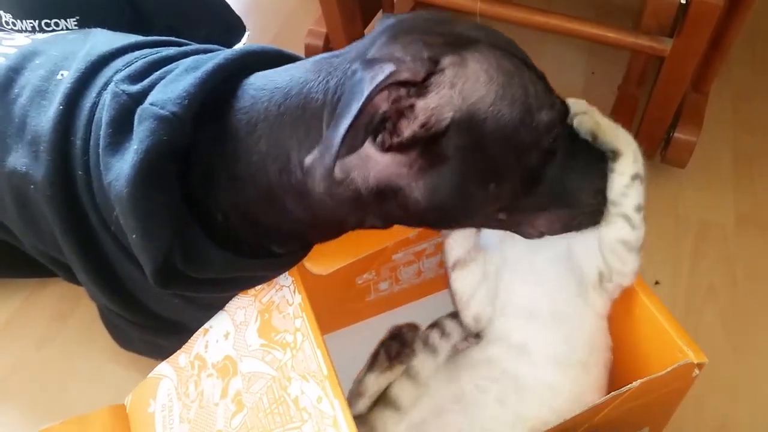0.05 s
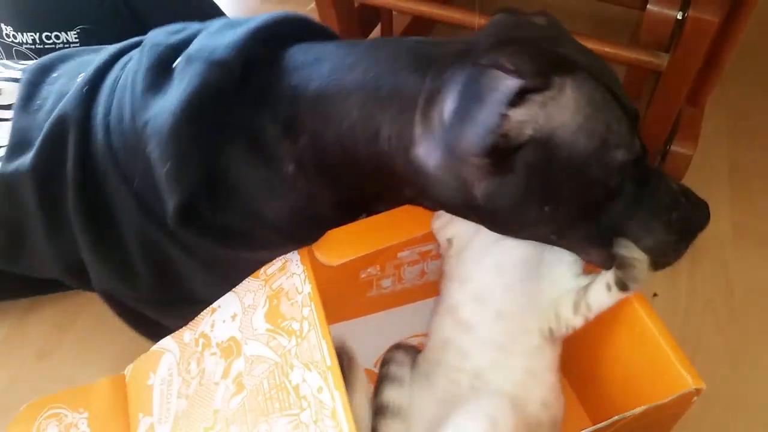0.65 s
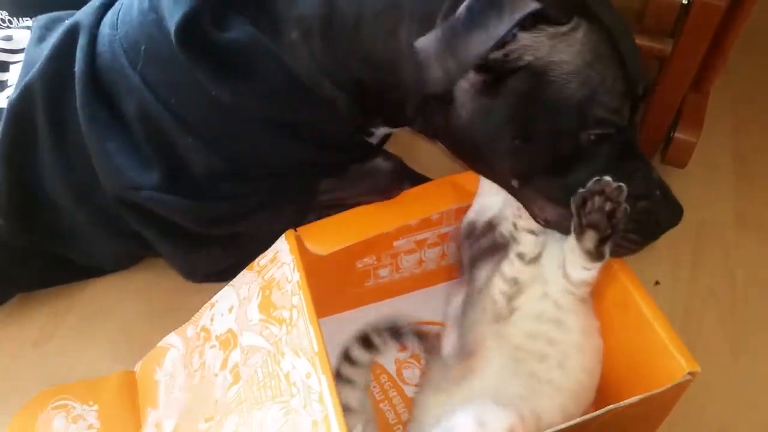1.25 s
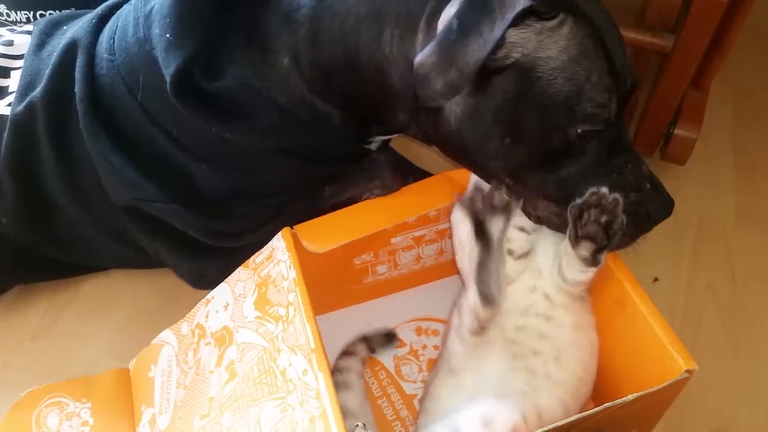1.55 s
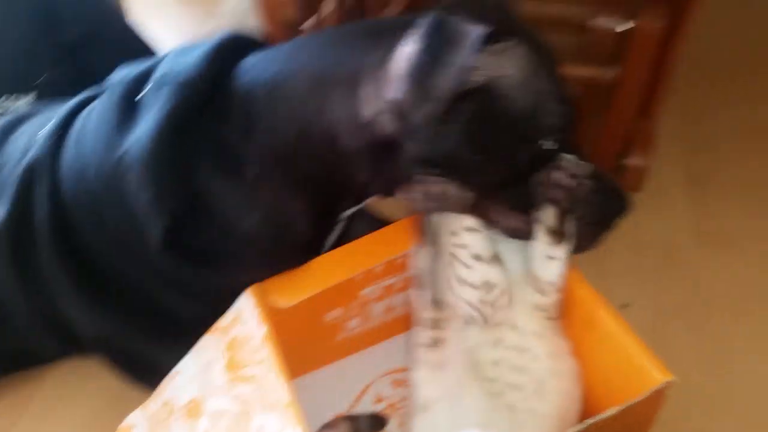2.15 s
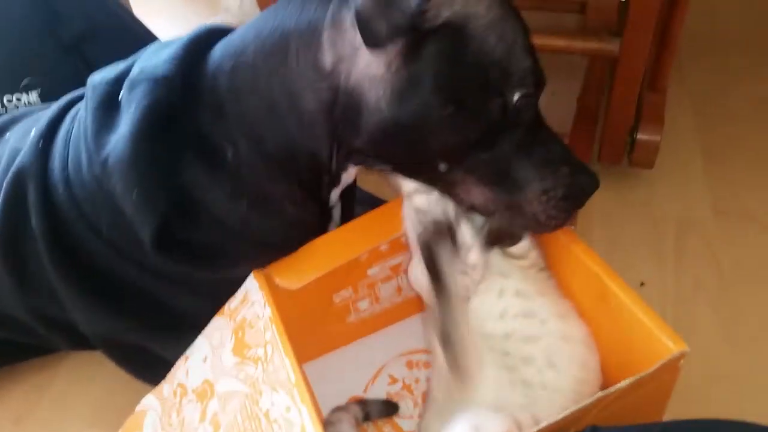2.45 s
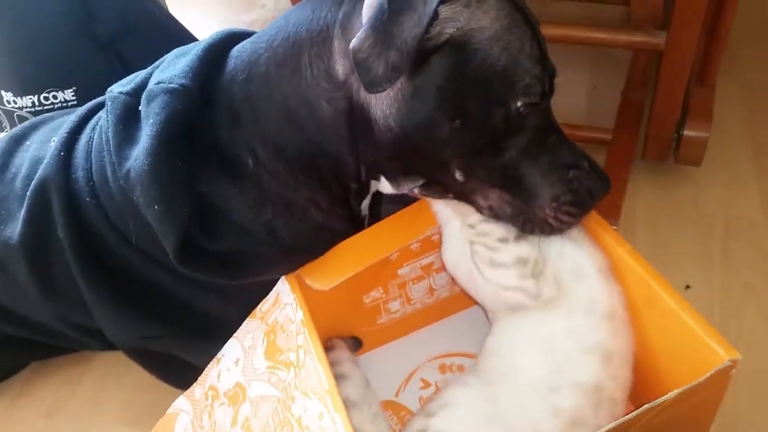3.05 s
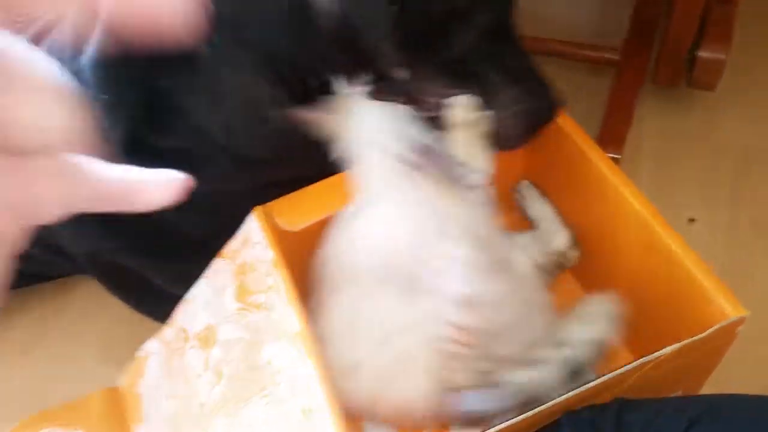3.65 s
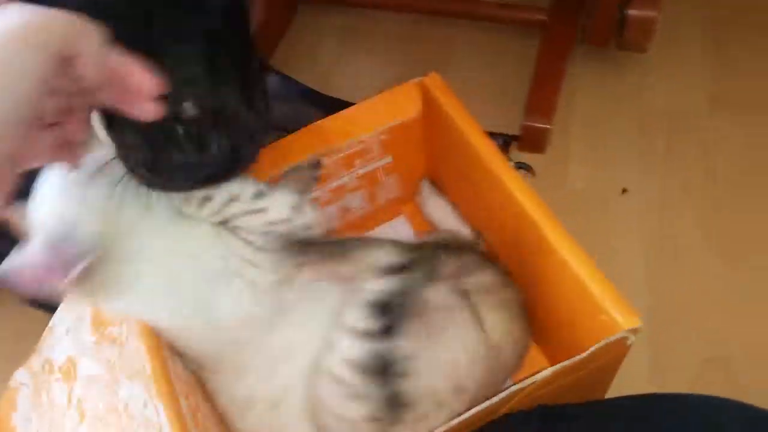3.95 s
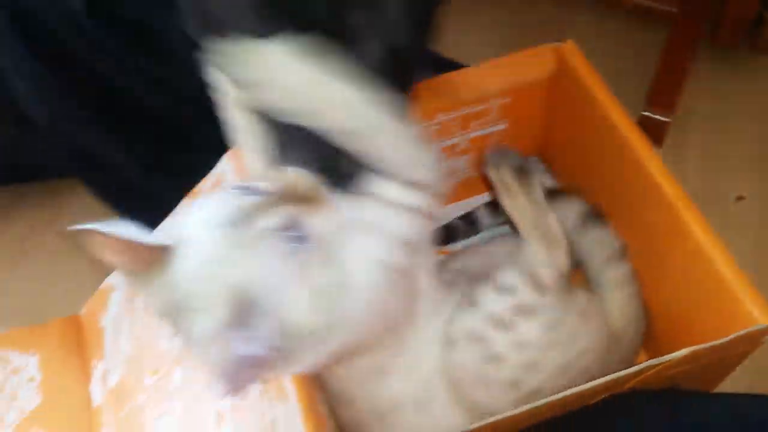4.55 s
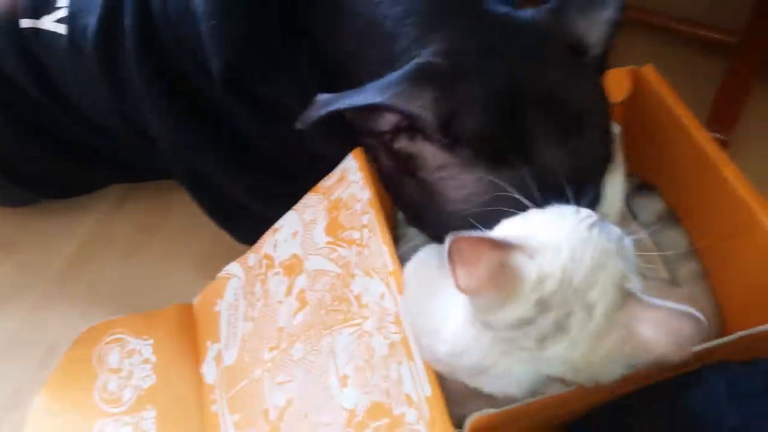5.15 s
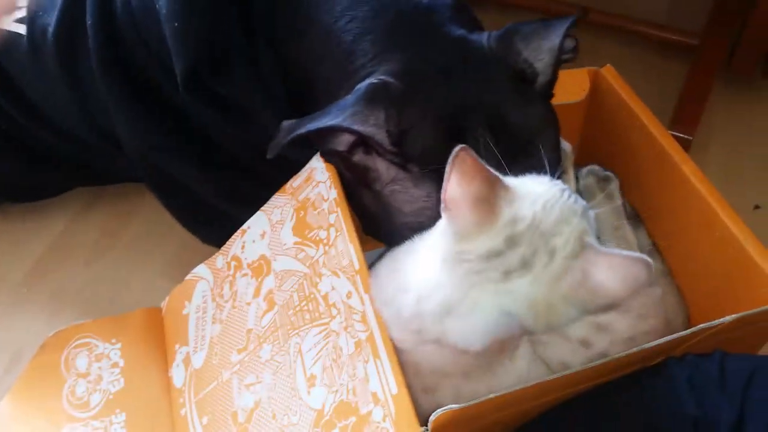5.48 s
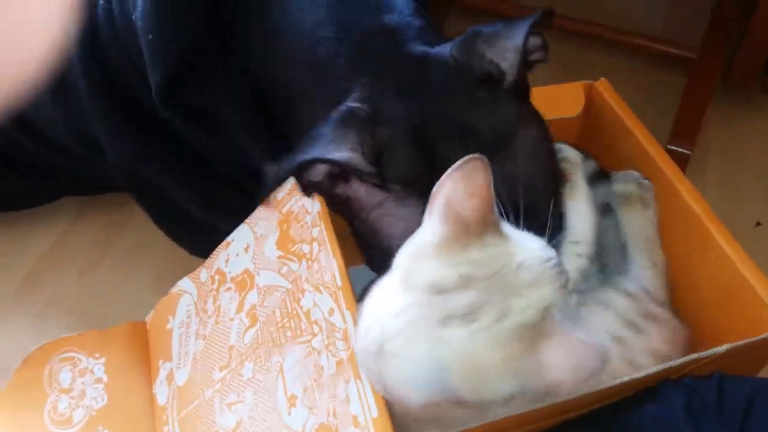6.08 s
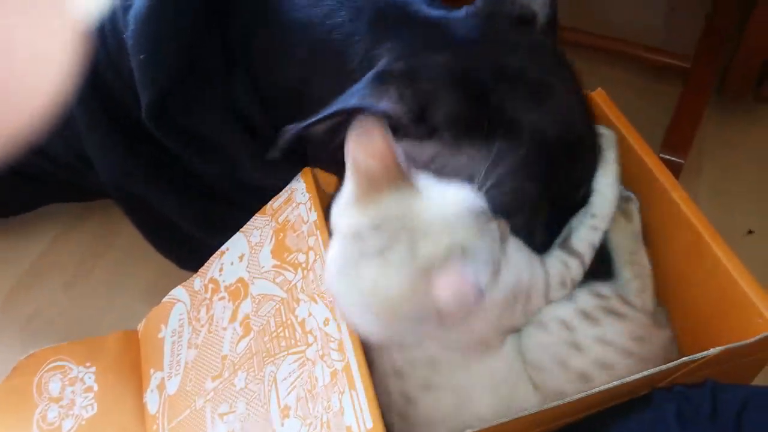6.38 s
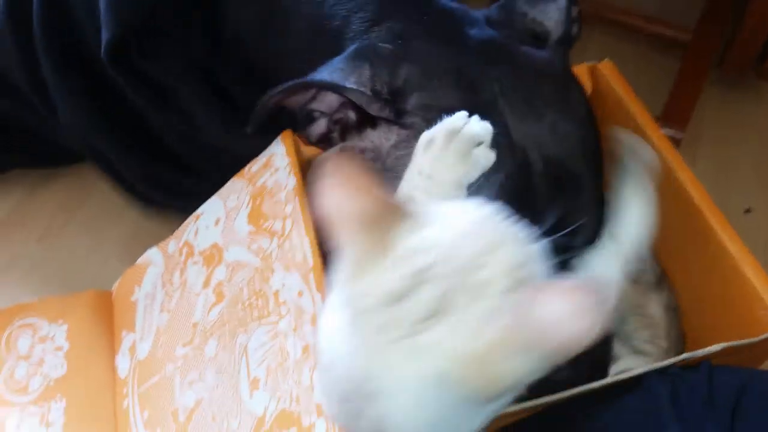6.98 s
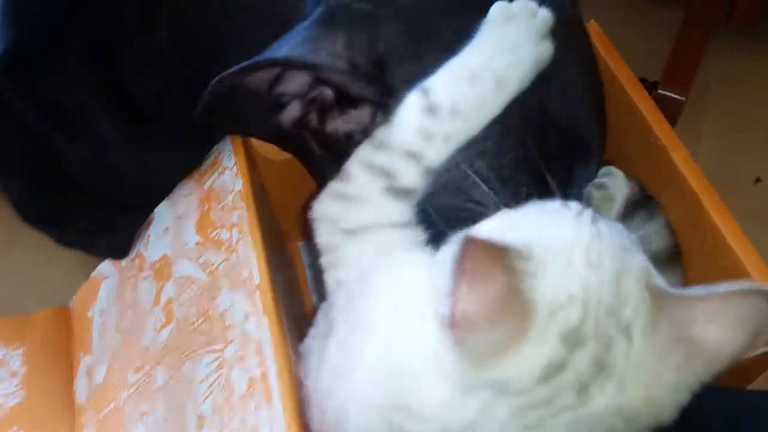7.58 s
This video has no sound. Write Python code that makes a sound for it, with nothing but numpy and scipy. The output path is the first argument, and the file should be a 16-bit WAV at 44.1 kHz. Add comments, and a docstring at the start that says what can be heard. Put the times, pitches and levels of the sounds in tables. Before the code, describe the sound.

In a small, quiet room a kitten and a dog wrestle in a cardboard box, heard close and slightly to the left. After a faint nose whistle from the dog, fur rubs in uneven bouts, bodies knock the walls and claws tick and scrape. The microphone is bumped a few times. Things settle briefly to soft, wet lip smacks before a last, louder flurry of thumps, squeaks and scratches.

```python
"""First comes a thin whistle from a dog's nose, over the soft rub of fur on cardboard.
The dog and a kitten are scuffling in a shoe box on the floor of a small room. Their bodies thump
the walls, claws tap and scrape, the card squeaks, and in a lull the dog smacks its lips.
A hand-held camera close by gets bumped; its left port (microphone opening) is louder
and rings in the treble."""
import sys
import numpy as np
from scipy import signal
from scipy.fft import rfft, irfft, next_fast_len
from scipy.io import wavfile
from scipy.ndimage import uniform_filter1d, map_coordinates

SR = 44100
rng = np.random.default_rng(int(sys.argv[2]) if len(sys.argv) > 2 else 0)


def materialize(psi):
    """Save the field psi as 16-bit PCM at rate SR to the path in sys.argv[1].

    A 1-D psi becomes a single channel; in a 2-D psi each row is a channel.
    """
    bounded = np.clip(np.atleast_2d(psi).T, -1, 1)
    quanta = np.round(bounded * 32767).astype(np.int16)
    wavfile.write(sys.argv[1], SR, quanta)


N = 344862

# Levels are relative: each function adds its own gain.
# air whistling in the dog's nose: t/s, level/dB, length/s, f/Hz
NOSE_WHISTLES = [(0, -56, .14, 2440), (0.08, -57, .24, 2430), (0.28, -62, .36, 2420), (0, -73, .3, 3750),
                 (0, -77, .24, 7120), (0.2, -73, .3, 7020)]
# six bouts of wriggling that swell and come to rest: t/s, rubbing effort/dB, treble level/dB
WRIGGLES = [
    [(0.0, -66, -85.5), (0.498, -67.5, -85.5), (0.672, -58.5, -74), (0.94, -53.5, -60.5),
     (1.128, -57.5, -67), (1.274, -49.5, -62), (1.512, -65, -71), (1.622, -64.5, -79.5), (1.74, -84, -91)],
    [(1.78, -76.5, -89), (1.87, -55, -82), (1.978, -83, -78.5), (2.004, -63, -73.5), (2.284, -53.5, -67),
     (2.39, -51, -65), (2.56, -58, -72.5), (2.702, -70, -83), (2.8, -73, -83)],
    [(2.84, -79, -82), (2.952, -69.5, -80), (3.074, -69.5, -80.5), (3.314, -63, -79.5),
     (3.402, -57.5, -69.5), (3.706, -54.5, -60.5), (3.92, -52.5, -55.5), (4.07, -57, -60),
     (4.16, -74, -73.5)],
    [(4.2, -66.5, -69.5), (4.418, -73.5, -76.5), (4.796, -61.5, -71.5), (4.912, -67.5, -73),
     (5.06, -77, -85), (5.196, -80.5, -99), (5.402, -90, -99), (5.564, -77.5, -101), (5.68, -108, -101)],
    [(5.74, -90, -101), (5.818, -82, -101), (5.95, -80, -93), (6.146, -80, -101.5), (6.278, -78.5, -99),
     (6.46, -83, -107)],
    [(6.5, -75.5, -98), (6.838, -72, -82.5), (6.984, -60.5, -75.5), (7.142, -59, -62.5), (7.304, -59, -59),
     (7.462, -49, -57), (7.536, -51, -51), (7.706, -61, -67), (7.82, -69, -74)],
]
# a wall judders as weight leans on it: t/s, level/dB, f/Hz, length/s
WALL_JUDDERS = [(0.05, -52, 200.5, 0.12), (6.595, -48.5, 173, 0.062), (6.682, -48.5, 165, .04),
                (6.72, -58, 180, 0.14), (6.77, -71, 120, 0.033)]
# soft blows on the box: t/s, level/dB, f/Hz (the wall swings a little below f)
BODY_THUMPS = [(0.229, -45, 215), (0.481, -39.5, 202), (0.873, -33, 226), (0.920, -19, 228),
               (1.068, -34, 205), (1.33, -23.5, 118), (1.444, -32.5, 168), (1.556, -20, 181),
               (1.832, -26, 580), (2.092, -25.5, 264), (2.396, -17, 187), (2.44, -24.5, 165),
               (2.902, -36, 226), (2.957, -36.5, 150), (2.977, -34.5, 375), (3.074, -35.5, 182),
               (3.262, -34, 257), (3.583, -18, 202), (3.591, -18, 391), (3.637, -27.5, 270),
               (3.827, -17.5, 280), (3.835, -19.5, 422), (3.839, -14.5, 153), (4.173, -42, 119),
               (4.332, -31, 120), (4.37, -36.5, 106), (4.389, -39, 114), (6.497, -43.5, 354),
               (6.960, -19.5, 272), (6.961, -29.5, 88), (7.061, -28, 237), (7.16, -34, 190),
               (7.342, -14, 299), (7.287, -35.5, 275), (7.438, -23.5, 294), (7.524, -43, 126),
               (7.586, -22.5, 152)]
# card squeaking, then claws scraping: t/s, level/dB, time to fade by 60 dB/s, centre f/Hz
CARD_SQUEAKS = [(0.479, -60.5, 0.48, 2060), (0.576, -57.5, 0.22, 2200), (2.05, -55, .2, 6650),
                (2.88, -79, 1, 7400), (3.1, -79, 0.86, 7500), (3.278, -54.5, 0.19, 7340),
                (4.036, -45.5, 0.065, 4100), (6.497, -57, 0.24, 1700), (6.985, -50.5, 0.36, 1010),
                (7.437, -35.5, 0.057, 930), (7.504, -28, 0.049, 3260)]
CLAW_SCRAPES = [(1.08, -51, 0.29, 2250), (1.845, -52, 0.63, 2760), (2.087, -38.5, 0.19, 3400),
                (2.105, -37.5, 0.086, 2120), (3.562, -37, 0.2, 1730), (3.950, -64, 0.98, 2400),
                (6.855, -69, .4, 3960), (7.264, -39, 0.59, 4300), (7.434, -29.5, .07, 5260),
                (7.512, -34, 0.29, 4900), (7.579, -18.5, 0.028, 1100), (7.600, -14.5, 0.017, 5200)]
# claws and teeth hitting the card: t/s, level/dB, treble cut-off f/Hz
HARD_TAPS = [(0.920, -33, 1000), (1.444, -37, 2360), (1.557, -31.5, 510), (1.830, -33, 5140),
             (1.833, -22, 3560), (1.851, -27.5, 6000), (2.976, -42, 1500), (3.263, -41.5, 1210),
             (3.543, -27, 1790), (3.836, -41, 1200), (3.393, -47, 1200), (3.975, -30, 4350),
             (4.438, -48, 3930), (6.497, -37.5, 950), (7.436, -46, 10400), (7.440, -25.5, 6840),
             (7.579, -15.5, 2600), (7.600, -18, 5000)]
# a flank or paw brushing past: middle t/s, level/dB, length/s, centre f/Hz
FUR_BRUSHES = [(1.003, -43.5, 0.12, 3420), (1.1, -56, 0.22, 13000), (1.25, -51.5, 0.2, 13000),
               (1.314, -50.5, .09, 1400), (1.343, -49.5, 0.061, 12400), (1.845, -59.5, 0.13, 11000),
               (2.044, -47, 0.14, 3050), (2.107, -47, 0.12, 5000), (2.32, -72.5, 0.24, 14000),
               (2.755, -74, 0.12, 14000), (3.30, -50, .13, 1760), (3.304, -55, 0.14, 8800),
               (3.523, -44.5, 0.13, 2220), (5.837, -75.5, 0.084, 734), (5.839, -78, 0.07, 9000),
               (6.046, -76, 0.12, 1300), (6.259, -70, 0.21, 1650), (6.266, -83.5, 0.21, 11000)]
# dry ticks beside the camera: t/s, level/dB, f/Hz, life/cycles, left over right/dB
NEAR_TICKS = [(2.429, -15, 2880, 1.54, 3), (2.661, -42.5, 1160, 0.47, -13), (3.613, -27.5, 3800, 3.1, 11),
              (3.654, -17.5, 856, 0.27, 9), (3.974, -29, 3000, 0.16, 4), (4.820, -43.5, 8000, 0.34, 10.5),
              (7.160, -43.5, 1480, 1.3, 8), (7.18, -40, 1340, 1.2, 11), (7.194, -42.5, 1610, 1.1, 13)]
# dull bumps on the camera: t/s, level/dB, f/Hz, left over right/dB
CAMERA_BUMPS = [(2.659, -35.5, 67.4, -15), (2.744, -43, 112, -15), (3.653, -20.5, 183, 5),
                (4.498, -35, 91, 7), (4.545, -47, 60.6, 15), (4.567, -38.5, 94, 22), (4.645, -40, 49.5, 18),
                (4.703, -21, 134, 31), (4.721, -35, 88, 26), (6.044, -47, 69, 17)]
# smacks of the dog's lips: t/s, level/dB, top mouth resonance f/Hz
LIP_SMACKS = [(5.091, -53.5, 1960), (5.148, -39.5, 1820), (5.21, -53, 1820), (5.307, -62.5, 2200),
              (5.375, -39.5, 2080), (5.511, -57.5, 1780), (5.962, -55, 2270), (6.443, -72, 2170)]
# resonances, the pitches at which the card rings: f/Hz, width/Hz, level/dB
CARD_MODES = [(414, 41, 0), (480, 73, 4), (705, 180, -7.5), (1104, 240, -10), (1374, 39, -13.5),
              (1790, 270, -12), (2620, 1400, -15.5), (3830, 480, -16), (7300, 1700, -16.5)]
# tone colours of the four rubbing layers and of the quiet room: f/Hz, level/dB
WALL_COLOUR = [(25, -18.5), (60, -3), (120, -2.5), (175, 1), (270, 0), (370, -1.5), (460, -3.5), (560, -4),
               (800, -18), (1400, -20.5), (3000, -70.5)]
RUB_COLOUR = [(300, -21), (700, 2.5), (1000, -1), (1500, -5.5), (2000, -2.5), (2450, -2), (3000, -10.5),
              (3800, -12), (5000, -22.5), (9000, -57.5)]
HISS_COLOUR = [(2000, -40.5), (3600, -3), (5000, -17), (6300, -3.5), (7100, -0.5), (8200, -6), (10000, -21),
               (13500, -5.5), (16000, -9)]
FIZZ_COLOUR = [(1500, -19.5), (3200, 2.5), (5000, 1), (7000, -1), (10000, 2), (13000, 0.5), (16000, -3)]
ROOM_COLOUR = [(25, 8.5), (60, -7.5), (170, -1.5), (300, -5.5), (600, -30), (1000, -21), (1900, -28),
               (3000, -38.5), (5000, -35), (16000, -32)]
# the room's echo: f/Hz, time to fade by 60 dB/s
ROOM_FADE = [(80, 0.36), (250, 0.22), (600, 0.33), (1500, 0.35), (4000, 0.33), (12000, 0.21)]
# how each port colours the sound: f/Hz, level/dB
LEFT_PORT = [(60, 9), (300, 2), (1300, 3), (3000, 2), (5000, -2.5), (6200, 3), (6900, 10), (7700, 8),
             (8500, 2), (10000, 0.5), (13000, 4), (16000, 2)]
RIGHT_PORT = [(60, 6.5), (300, -1.5), (1300, -3), (3000, -3.5), (5000, -6), (6200, -8), (7500, -13.5),
              (10000, -16), (13000, -6), (16000, -0.5)]
# how alike the two ports hear scattered sound: f/Hz, likeness (1 = the same)
PORT_LIKENESS = [(30, 0.31), (70, .7), (130, .9), (300, 0.83), (640, 0.72), (1400, .1), (3000, 0.055)]


def amp(db):
    """Turn decibels into a gain."""
    return 10 ** (np.asarray(db) / 20)


def unit(x):
    """Scale x to an average strength (rms) of 1."""
    return x / np.sqrt(np.mean(x ** 2) + 1e-20)


def along(points, hz):
    """Read a table of (f, value) points at hz, on a log axis."""
    f, v = np.transpose(points)
    return np.interp(np.log(hz + 1), np.log(f), v)


def clock(count):
    """The times of count samples, in seconds."""
    return np.arange(count) / SR


def wobble(rate):
    """A smooth curve through rate random values a second."""
    return map_coordinates(rng.standard_normal(int(N * rate / SR) + 4), [clock(N) * rate])


def filtered(x, response):
    """Give each frequency f in x the gain response(f)."""
    n = x.shape[-1]
    padded = next_fast_len(n + 8192)
    return irfft(rfft(x, padded) * response(np.fft.rfftfreq(padded, 1 / SR)), padded)[..., :n]


def add(track, s, sound):
    """Mix a sound into the track at s seconds."""
    part = track[:, max(round(s * SR), 0):][:, :sound.shape[-1]]
    part += sound[..., :part.shape[-1]]


def panned(x, lead_db):
    """Make the left side lead_db louder than the right, keeping their average."""
    left = amp(lead_db)
    return 2 * np.array([[left], [1]]) * x / (1 + left)


def diffuse(pair):
    """Two unrelated signals as the ports hear them: alike in the bass only."""
    turn = lambda f: np.arccos(np.clip(along(PORT_LIKENESS, f), -1, 1)) / 2
    mid, side = filtered(pair, lambda f: np.array([np.cos(turn(f)), np.sin(turn(f))]))
    return np.array([mid + side, mid - side])


def friction(colour, count, slips=0, grain=0):
    """Coloured stereo noise, roughened by tiny slips (so many a second) of strength grain."""
    catches = (rng.random(count) < slips / SR) * rng.standard_normal((2, count))
    drive = rng.standard_normal((2, count)) + grain * unit(catches)
    return unit(filtered(diffuse(drive), colour))


def resonances(modes, f):
    """The response of something that rings at each (f, width, level) in modes."""
    return sum((-1) ** k * amp(db) * 1j * f * width / (hz * hz - f * f + 1j * f * width)
               for k, (hz, width, db) in enumerate(modes))


def skid_band(f, centre_hz, octaves):
    """A bell-shaped band of frequencies, leaning to the bass."""
    return np.exp(-.5 * (np.log2((f + 1) / centre_hz) / octaves) ** 2) / np.sqrt(1 + f / centre_hz)


def in_room(x, wet_db, build_s=0.0037):
    """The direct sound plus its echo, at wet_db, from floor, furniture and walls."""
    hz, t, spectrum = signal.stft(rng.standard_normal((2, SR // 2)), SR, nperseg=256)
    fade = amp(-60 * t / along(ROOM_FADE, hz)[:, None])
    tail = diffuse(signal.istft(spectrum * fade, SR, nperseg=256)[1])
    tail *= 1 - np.exp(-(clock(tail.shape[1]) / build_s) ** 2)
    tail *= amp(wet_db) / np.linalg.norm(tail[0])
    tail[:, 0] += 1  # the direct sound
    return signal.fftconvolve(np.atleast_2d(x), tail, axes=1)


def patchy(x, depth_db):
    """Shifting contact points bring out ever different resonances."""
    spectrum = signal.stft(x, nperseg=1024)[2]
    patches = rng.standard_normal(spectrum.shape[1:])
    for _ in range(2):
        patches = uniform_filter1d(uniform_filter1d(patches, size=7, axis=0), size=5, axis=1)
    return unit(signal.istft(spectrum * amp(depth_db * unit(patches)), nperseg=1024)[1][:, :N])


def contact(response, t60):
    """A filtered click, at peak 1, with a crunch that fades by 60 dB in t60 seconds."""
    t = clock(SR // 8)
    click = .16 * diffuse(rng.standard_normal((2, len(t)))) * amp(-60 * t / t60)
    click[:, 0] += 1
    ring = filtered(click, response)
    return ring / np.abs(ring).max()


def push(hz, cycles, count):
    """The sound of a swing that swells softly and dies within a few cycles, at peak 1."""
    turns = hz * clock(count)
    envelope = turns * np.tanh(4 * turns) * np.exp(-2 * turns / max(cycles, .2))
    pressure = np.diff(envelope * np.sin(2 * np.pi * turns), prepend=0)
    return pressure / np.abs(pressure).max()


def whistles():
    """Air through the dog's narrow nostril sings a fuzzy note."""
    out = np.zeros((2, N))
    for s, db, length, hz in NOSE_WHISTLES:
        t = clock(int(length * SR))
        air = friction(lambda f: resonances([(hz, 230, 0)], f) ** 2, len(t))
        swell = np.sqrt(np.abs(np.sin(np.pi * t / length)))
        add(out, s, amp(db - 6.5) * in_room(swell * air, wet_db=-8.5))
    return out


def rubbing():
    """Fur and cloth drag over the card; the walls rumble, and harder strokes add a bright fizz."""
    s, *levels = np.vstack(WRIGGLES).T
    effort_db, treble_db = [np.interp(clock(N), s, level) for level in levels]
    grip = np.tanh(wobble(35))  # the contact catches and lets go in all layers together
    layer = lambda colour, slips, grain: friction(lambda f: amp(along(colour, f)), N, slips, grain)
    wall_db = -54 + 0.64 * (effort_db + 60) + 3.9 * np.tanh(wobble(22))
    fizz_db = -56 + 1.175 * (treble_db + 60)
    wall = layer(WALL_COLOUR, slips=110, grain=0.65)
    rub = patchy(layer(RUB_COLOUR, slips=600, grain=0.36), depth_db=2.5)
    hiss = patchy(layer(HISS_COLOUR, slips=3300, grain=0.32), depth_db=3.0)
    fizz = patchy(layer(FIZZ_COLOUR, slips=2000, grain=0.77), depth_db=1.1)
    return (amp(wall_db + 3.7 * grip) * wall
            + amp(effort_db + 2 + 1.9 * grip) * rub
            + amp(treble_db - 0.5 + 2.4 * grip) * hiss
            + amp(fizz_db + 1.1 * grip) * fizz)


def room_rumble():
    """The faint, steady rumble of the room."""
    return amp(-74.5) * friction(lambda f: amp(along(ROOM_COLOUR, f)), N)


def snags(per_second=20):
    """Claw tips catch on the card at random, harder in the brighter strokes."""
    out = np.zeros((2, N))
    s, _, treble_db = np.vstack(WRIGGLES).T
    for place, size, edge in rng.random((int(per_second * N / SR), 3)):
        at, edge_hz = place * N / SR, 4500 * 2 ** (edge - .5)
        tip = lambda f: (1j * f / (1j * f + edge_hz)) ** 2 / (1 + 1j * f / (2 * edge_hz))
        ring = contact(lambda f: resonances(CARD_MODES, f) * tip(f), t60=0.012)
        db = np.interp(at, s, treble_db) + 9.5 - 4 * np.log(.05 + size)  # a few stand out
        add(out, at, amp(db) * ring)
    return out


def judders():
    """Slow sticking and slipping keeps a wall humming for a moment."""
    out = np.zeros((2, N))
    for s, db, hz, length in WALL_JUDDERS:
        t = clock(int(length * SR))
        hum = amp(db) * np.sin(np.pi * t / length) * np.sin(2 * np.pi * hz * t)
        add(out, s, in_room(hum, wet_db=-10))
    return out


def thumps(wall_hz=200):
    """A body shoves a wall, which swings once or twice and shakes the rest of the box."""
    out, t = np.zeros((2, N)), clock(SR // 5)
    for s, db, hz in BODY_THUMPS:
        # a stiffer, higher spot swings more times and passes less bass on to the box
        swing = push(0.91 * hz, cycles=0.71 * (hz / wall_hz) ** 0.98, count=len(t))
        colour = lambda f: amp(along(WALL_COLOUR, f)) * f ** 2 / (f ** 2 + hz ** 2)
        shake = friction(colour, len(t), slips=97, grain=0.13)
        shake *= amp(-15.5 - 60 * t / 0.11) * (1 - np.exp(-t / 0.0052))
        # more echo for fainter blows (farther off) and higher ones (they spread better)
        wet_db = -1 - 0.39 * (db + 28) + 2 * np.log2(hz / wall_hz)
        add(out, s, amp(db - 2.26) * in_room(swing + shake, wet_db))
    return out


def skids(events, octaves):
    """Claws and card grip and slip in a burst: a narrow band squeaks, a wide one scrapes."""
    out, t = np.zeros((2, N)), clock(SR // 3)
    for s, db, t60, centre_hz in events:
        rise_s = 0.0035 * 2 ** ((-45 - db) / 10)  # faster, louder skids start more suddenly
        stroke = np.minimum(t / rise_s, 1) * amp(-60 * np.maximum(t - rise_s, 0) / t60)
        rasp = friction(lambda f: skid_band(f, centre_hz, octaves), len(t), slips=470, grain=0.33)
        add(out, s, amp(db + 4) * in_room(stroke * rasp, wet_db=-4))
    return out


def taps():
    """A claw or tooth rings the card; harder taps have more treble and less body."""
    out = np.zeros((2, N))
    for s, db, edge_hz in HARD_TAPS:
        hardness = lambda f: (1j * f / (1j * f + .2 * edge_hz) / (1 + 1j * f / edge_hz)) ** 2
        ring = contact(lambda f: resonances(CARD_MODES, f) * hardness(f), t60=0.015)
        add(out, s, amp(db - 1.35) * in_room(ring, wet_db=-1, build_s=0.0031))
    return out


def brushes():
    """Fur sweeps over the card in one smooth stroke, loudest where it moves fastest."""
    out = np.zeros((2, N))
    for s, db, length, centre_hz in FUR_BRUSHES:
        t = clock(int(length * SR))
        fur = friction(lambda f: skid_band(f, centre_hz, octaves=0.75), len(t), slips=440, grain=0.5)
        swell = np.sin(np.pi * t / length) ** 2
        add(out, s - length / 2, amp(db) * in_room(swell * fur, wet_db=-7.5))
    return out


def ticks():
    """Dry ticks beside the camera reach the ports directly, with no echo."""
    out, t = np.zeros((2, N)), clock(SR // 8)
    for s, db, hz, cycles, lead_db in NEAR_TICKS:
        burst = .22 * rng.standard_normal(len(t)) * amp(-60 * t / 0.0039)
        snap = filtered(burst, lambda f: 1 / (1 + 1j * f / (3 * hz)) ** 2)
        add(out, s, panned(amp(db + 2) * (push(hz, cycles, len(t)) + snap), lead_db))
    return out


def bumps():
    """A knock on the camera reaches the ports directly as a dull thud and a short rumble."""
    out, t = np.zeros((2, N)), clock(SR // 8)
    for s, db, hz, lead_db in CAMERA_BUMPS:
        thud = push(hz, cycles=0.84, count=len(t))
        rumble = friction(lambda f: resonances([(53, 83, 0)], f), len(t))
        rumble = filtered(rumble, lambda f: 1 / (1 + (f / 300) ** 4))
        rumble *= amp(-7 - 60 * t / 0.05) * np.tanh(t / .004)
        add(out, s, panned(amp(db - 2) * (thud + rumble), lead_db))
    return out


def smacks():
    """The dog's lips part with a wet click that rings its mouth."""
    out = np.zeros((2, N))
    for s, db, mouth_hz in LIP_SMACKS:
        mouth = [(400, 260, 0), (950, 350, -4), (mouth_hz, 550, 4)]
        ring = contact(lambda f: resonances(mouth, f) / (1 + 1j * f / 3800) ** 4, t60=0.047)
        add(out, s, amp(db - 5) * in_room(ring, wet_db=-5.5))
    return out


def scene():
    """All the sounds in and around the box, added together."""
    return (whistles() + rubbing() + room_rumble() + snags() + judders() + thumps()
            + skids(CARD_SQUEAKS, octaves=0.27) + taps() + brushes() + skids(CLAW_SCRAPES, octaves=1)
            + ticks() + bumps() + smacks())


def record(dry):
    """Each port colours the sound, the loudest peaks are rounded off, and the highest treble is cut."""
    ceiling, top_hz = 0.52, 16000
    lead_s = 0.00011  # the box lies nearer the left port
    colour = lambda f: amp([along(LEFT_PORT, f), along(RIGHT_PORT, f)])
    timing = lambda f: np.exp(1j * np.pi * f * lead_s * np.array([[1], [-1]]))
    heard = filtered(dry, lambda f: colour(f) * timing(f))
    rounded = heard / (1 + np.abs(heard / ceiling) ** 4) ** (1 / 4)
    return filtered(rounded, lambda f: np.clip((top_hz - f) / 200 + .5, 0, 1))


dry = scene()
out = record(dry)
materialize(out)
```